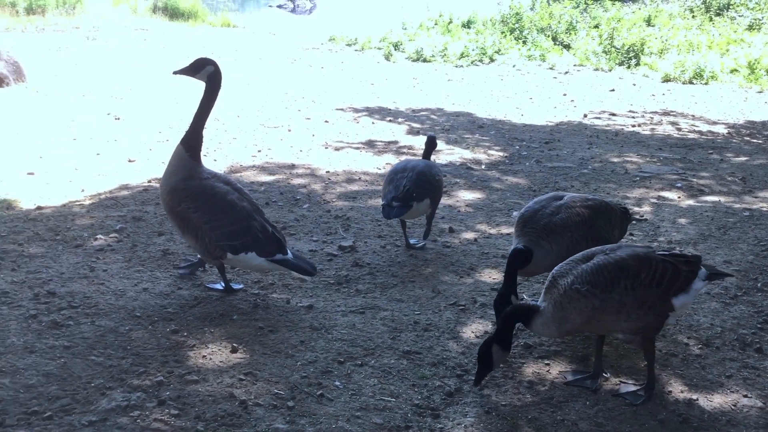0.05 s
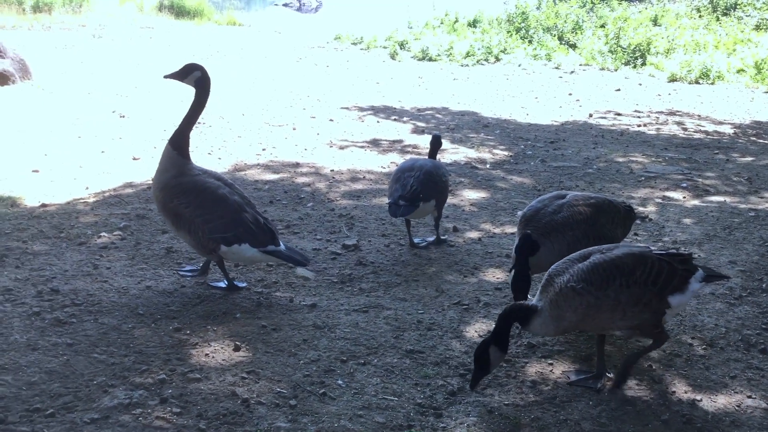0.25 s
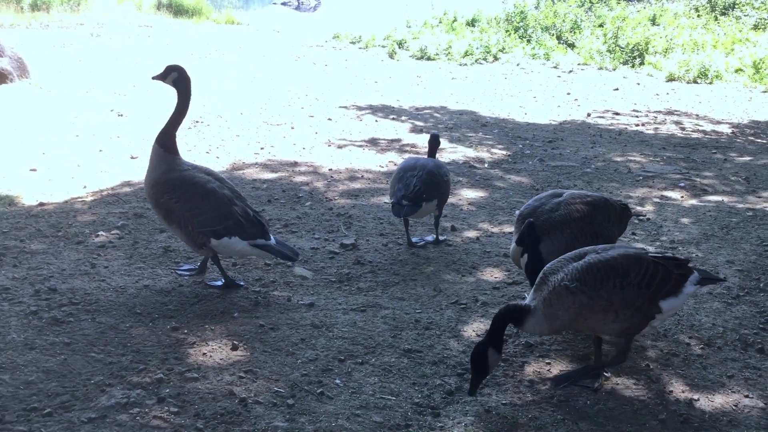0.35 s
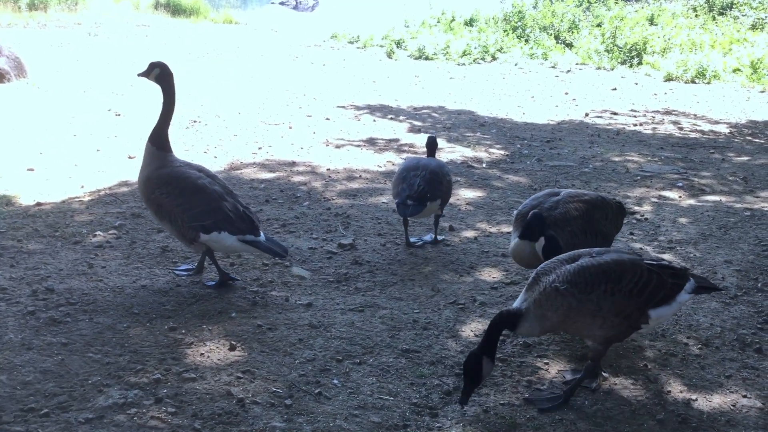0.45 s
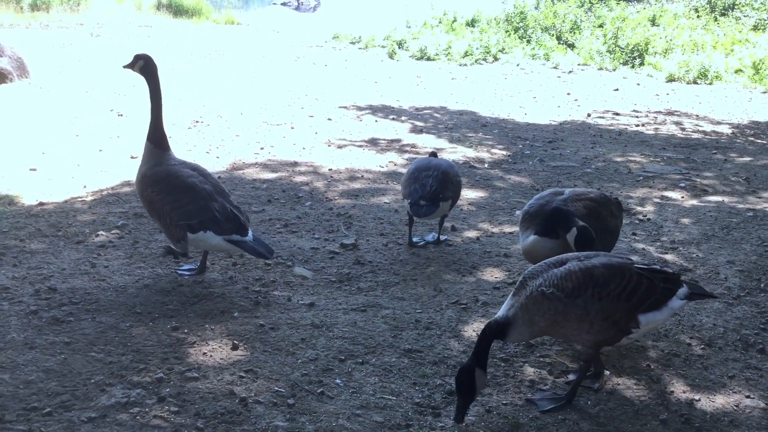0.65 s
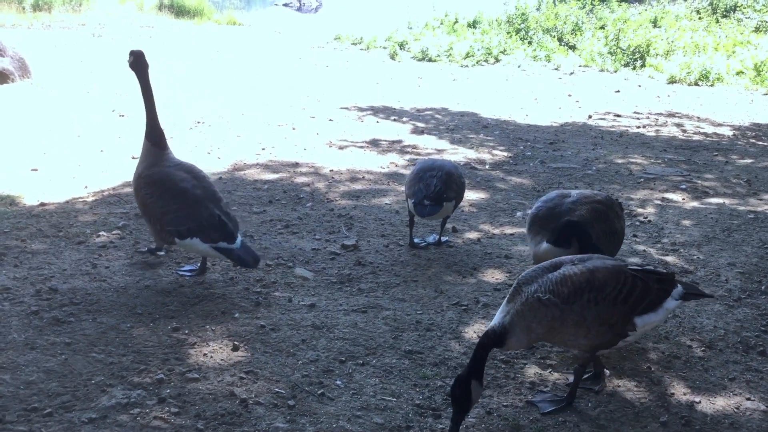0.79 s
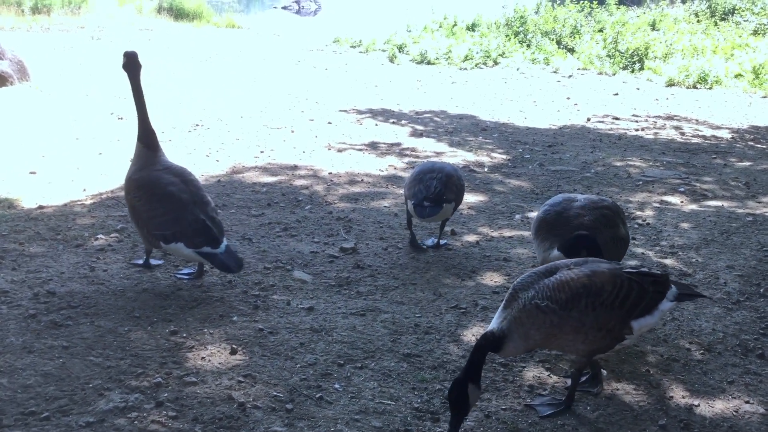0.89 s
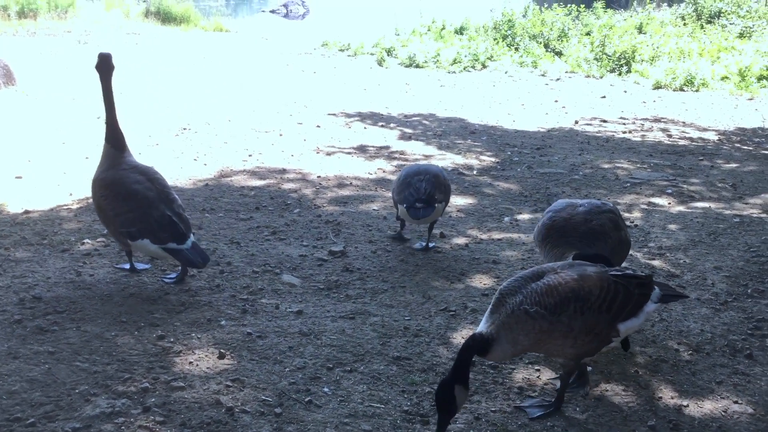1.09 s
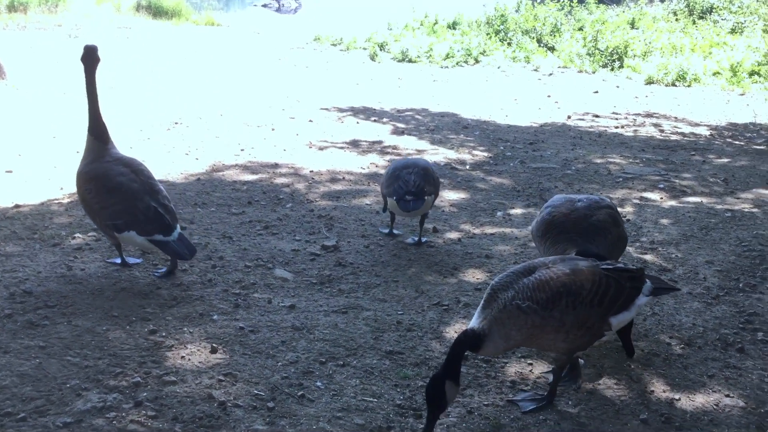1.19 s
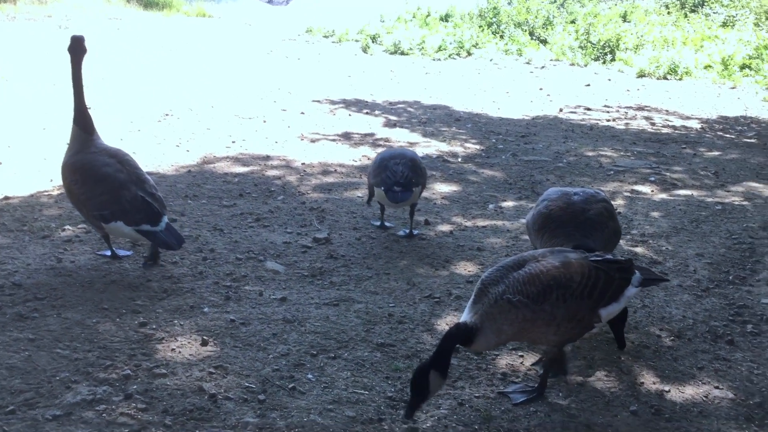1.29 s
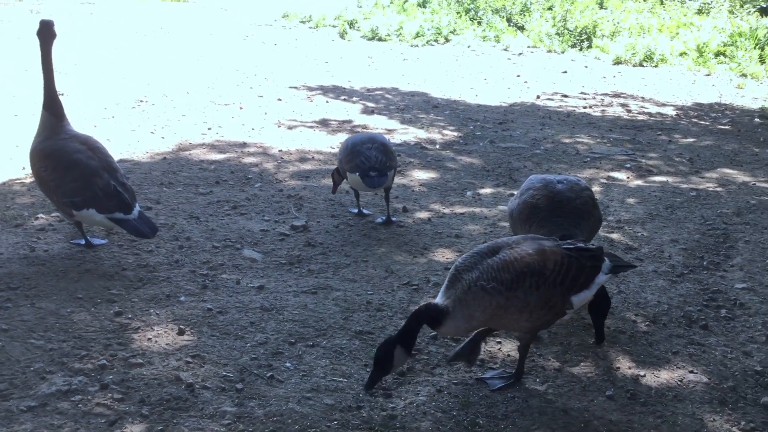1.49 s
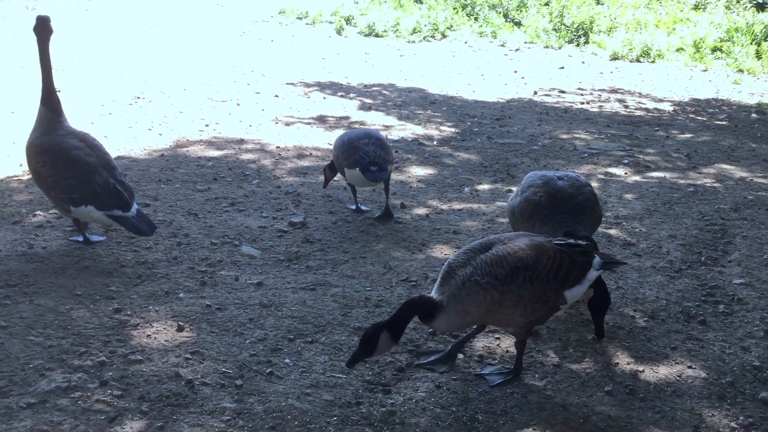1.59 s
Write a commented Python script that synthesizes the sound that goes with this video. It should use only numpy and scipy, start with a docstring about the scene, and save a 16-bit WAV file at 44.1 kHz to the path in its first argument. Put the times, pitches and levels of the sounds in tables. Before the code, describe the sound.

A goose gives three quick, thin honks while the flock steps and pecks in grit.

```python
"""A goose gives three quick, thin, almost whistled calls on a shady shore. Each arches up and down in pitch and
flares where its pitch meets one of the throat's two resonances (pitches at which it rings easily). The last
call breaks into a squeak. The flock steps and pecks in dry grit, making soft thuds and short crunches, over a
low distant rumble and a soft wash of open air."""
import sys
import numpy as np
from scipy import signal
from scipy.fft import rfft, irfft, next_fast_len
from scipy.io import wavfile
from scipy.ndimage import map_coordinates

SR = 44100
rng = np.random.default_rng(int(sys.argv[2]) if len(sys.argv) > 2 else 0)


def dump(signal):
    """Clip the signal to [-1, 1] and save it as 16-bit WAV at the path in sys.argv[1]."""
    limited = np.clip(np.atleast_2d(signal).T, -1, 1)
    pcm = np.round(limited * 32767).astype(np.int16)
    wavfile.write(sys.argv[1], SR, pcm)


N = 72765

# Tone colour of the rumble, the air, shuffled grit and cracking grains (frequency [Hz], level [dB])
RUMBLE_COLOUR = [(25, -51.5), (40, -40.5), (55, -18), (80, -9), (120, -5), (165, -0.5), (215, -1),
                 (270, -8), (350, -13.5), (480, -24), (700, -54)]
AIR_COLOUR = [(200, -30.5), (420, -3.5), (650, -0.5), (950, 2.5), (1400, 0), (2100, -8.5), (3000, -14.5),
              (4200, -16.5), (7000, -22.5), (9000, -21), (11000, -27), (14500, -32.5)]
SHUFFLE_COLOUR = [(1000, -14), (3000, 9), (5500, 0), (9000, -9), (15000, -10.5)]
SNAP_COLOUR = [(1500, -27), (3500, -0.5), (6500, 1.5), (9000, -4.5), (14000, -7)]
# Steps and pecks in the grit (time [s], level [dB], time to fade by 60 dB [s], centre frequency [Hz])
CRUNCHES = [(.075, -72.5, 0.086, 6900), (.1, -69.5, 0.055, 4840), (.163, -63.5, 0.1, 4630),
            (.199, -66, .06, 5200), (.26, -63.5, .04, 4700), (0.285, -64, 0.013, 4200),
            (0.31, -67.5, .018, 6200), (.365, -67.5, 0.082, 4550), (.378, -67, 0.12, 4530),
            (0.475, -70, 0.032, 4950), (.736, -76.5, 0.02, 4940), (0.879, -70.5, .03, 4740),
            (1.006, -65.5, 0.043, 5560), (1.05, -75, 0.29, 5400), (1.147, -75, 0.013, 3870),
            (1.214, -68.5, 0.029, 3730), (1.277, -69.5, 0.041, 3160), (1.484, -73.5, .08, 4300),
            (1.545, -74, 0.049, 8200)]
# Soft thuds of feet (time [s], level [dB], pitch [Hz])
FOOTFALLS = [(0.159, -47.5, 147), (0.229, -45, 159.4), (0.536, -54.5, 105), (.585, -56.5, 94.8),
             (0.732, -54, 181), (.823, -51.5, 154), (0.946, -51, 111), (1.153, -49.5, 158)]
# Single grains cracking (time [s], level [dB])
SNAPS = [(0.162, -61.5), (.479, -60.5), (.881, -74), (1.008, -69), (1.148, -75), (1.215, -79), (1.278, -69)]
# The path of each call (time [s], pitch [Hz], effort [dB])
CALL_1 = [(0.2315, 897.4, -59.5), (0.2479, 985.5, -28.5), (0.2606, 1131, -32), (0.283, 1032, -25),
          (0.292, 1023, -27), (0.3095, 997, -30.5), (0.3151, 926, -29), (0.3211, 866, -35),
          (0.3327, 843, -37.5), (0.337, 845, -57)]
CALL_2 = [(0.3933, 1094, -54.2), (0.4104, 1176, -38.5), (0.4146, 1363, -39), (0.4336, 1519, -43),
          (0.4433, 1380, -33), (0.4519, 1245, -36.5), (0.4711, 1153, -30), (0.4807, 1016, -44.5),
          (0.4874, 850, -52)]
CALL_3 = [(0.5262, 928, -51.5), (0.5382, 973, -28.5), (0.5572, 1247, -25), (0.568, 1682, -39.5),
          (0.5877, 1878, -28), (0.6018, 1700, -39.5), (0.6107, 1368, -23), (0.6167, 1259, -19.6),
          (0.6304, 1150, -18), (0.6403, 962, -36), (0.648, 983, -68.5)]
# The voice of each call (path, base level at twice the pitch [dB], base level at three times the
# pitch [dB], extra rasp [dB], throaty start [dB], overtone drift [dB/s])
VOICES = [(CALL_1, -71, -75, -4.5, -48.5, -130), (CALL_2, -65, -73.5, -6, -67, 40),
          (CALL_3, -71, -84.5, -3.5, -65, -29)]
# How the throat shapes the main tone (pitch [Hz], gain [dB])
THROAT_GAIN = [(800, -15), (900, -3), (1000, 0.0), (1110, -10.5), (1220, -5), (1330, -6.5), (1480, -19),
               (1700, -24), (1950, -31.5)]
# How the beak shapes the overtones, the higher tones above it (frequency [Hz], gain [dB])
BEAK_GAIN = [(1700, -9), (2050, 4.5), (2300, -0.5), (2500, -5), (2850, 3.5), (3050, -4.5), (3350, 10),
             (3600, 0.5), (3900, -7), (6000, -15.5)]
# Tone colour of the rasp in the voice (frequency [Hz], level [dB])
RASP_COLOUR = [(300, -18.5), (700, -5.5), (1200, 2.5), (1700, -8.5), (2300, 2.5), (3000, -11.5), (3700, -6),
               (5500, -18.5), (9000, -30.5), (15000, -43)]
# Echoes from the ground and the bank (delay [s], level [dB])
ECHOES = [(.011, -29), (0.025, -26.5)]
# Resonances of one firmer peck (frequency [Hz], width [Hz], level [dB])
PECK_RESONANCES = [(1610, 170, -10), (2580, 193, 5), (3440, 350, -4), (5050, 420, -8), (9000, 670, -21.5)]


def amp(db):
    """Turn decibels into a number to multiply by."""
    return 10 ** (np.asarray(db) / 20)


def unit(x):
    """Scale a sound to an average strength (rms) of 1."""
    return x / np.sqrt(np.mean(x ** 2) + 1e-20)


def clock():
    """The time of every sample, in seconds."""
    return np.arange(N) / SR


def along(points, hz):
    """Read between a table's (frequency, value) points, with octaves evenly spaced."""
    f, v = np.transpose(points)
    return np.interp(np.log(hz + 1), np.log(f + 1), v)


def wobble(per_s):
    """A smooth curve through per_s random values a second."""
    return map_coordinates(rng.standard_normal(2048), [clock() * per_s], mode="wrap")


def filtered(x, response):
    """Turn each frequency f in x up or down by response(f)."""
    size = next_fast_len(N + 8192)
    return irfft(rfft(x, size) * response(np.fft.rfftfreq(size, 1 / SR)), size)[:N]


def noise(colour):
    """Noise of strength 1 with the given tone colour."""
    return unit(filtered(rng.standard_normal(N), lambda f: amp(along(colour, f))))


def resonance(f, hz, width):
    """A response that favours frequencies near hz."""
    return 1j * f * width / (hz * hz - f * f + 1j * f * width)


def burst(at_s, rise_s, fade_s):
    """A loudness curve that swells until at_s, then falls 60 dB in fade_s."""
    t = clock() - at_s
    return np.exp(np.minimum(t, 0) / rise_s) * amp(-60 * np.maximum(t, 0) / fade_s)


def grains():
    """Noise whose level flickers fast, so it sounds gritty."""
    return rng.standard_normal(N) * amp(3 * wobble(900))


def shore():
    """Distant rumble and open air, each swaying a little in level."""
    rumble = amp(-63.5 + 1.5 * wobble(11.9)) * noise(RUMBLE_COLOUR)
    air = amp(-67 + 0.7 * wobble(5.5)) * noise(AIR_COLOUR)
    return rumble + air


def grit(sharpness=2.2, hiss_db=-28.5):
    """Feet and bills crunch in dry soil, with a soft shuffle in between."""
    shuffle = unit(filtered(grains(), lambda f: amp(along(SHUFFLE_COLOUR, f))))
    out = amp(-81.5 + 3.5 * wobble(57)) * shuffle
    for at_s, db, fade_s, hz in CRUNCHES:
        scrape = unit(filtered(grains(), lambda f: resonance(f, hz, hz / sharpness) ** 2 + amp(hiss_db)))
        out += amp(db) * burst(at_s, rise_s=0.0023, fade_s=fade_s) * scrape
    return out


def footfalls(rise_s=0.0035, fade_s=0.057):
    """Webbed feet pat the ground, each making a short, low tone."""
    out = np.zeros(N)
    for at_s, db, hz in FOOTFALLS:
        age = np.maximum(clock() - at_s, 0)
        soft_start = 1 - np.exp(-age / rise_s)
        out += amp(db) * burst(at_s, rise_s, fade_s) * soft_start * np.sin(2 * np.pi * hz * age)
    return out


def snaps():
    """Grains of grit crack crisply under feet and bills."""
    loudness = sum(amp(db) * burst(at_s, rise_s=0.0005, fade_s=0.0066) for at_s, db in SNAPS)
    return loudness * noise(SNAP_COLOUR)


def goose_call(path, second_db, third_db, rasp_db, start_db, drift_db_per_s):
    """A nearly pure tone glides through the throat, with weak overtones, rasp and a throaty start."""
    usual_effort_db, break_hz, edge_s = -24, 1560, 0.004
    t = clock()
    times, hz, db = np.transpose(path)
    pitch = np.interp(t, times, hz) * (1 + 0.003 * wobble(300))
    effort_db = np.interp(t, times, db) + 0.7 * wobble(300)
    push_db = effort_db - usual_effort_db
    airy = 1 / (1 + (break_hz / pitch) ** 20)  # nears 1 above break_hz, where the voice turns airy
    phase = 2 * np.pi * np.cumsum(pitch) / SR + 0.4 * airy * wobble(900)
    hoarseness = 0.12 * wobble(900)
    tone = amp(effort_db + along(THROAT_GAIN, pitch)) * np.sin(phase)
    drift_db = drift_db_per_s * (np.clip(t, times[0], times[-1]) - times.mean())
    # Pushing harder lifts both the overtones and the rasp.
    bright_db = 0.34 * push_db + drift_db
    for multiple, base_db in ((2, second_db), (3, third_db)):
        gain = amp(base_db + bright_db + along(BEAK_GAIN, multiple * pitch) + 2 * wobble(70))
        tone += gain * np.sin(multiple * (phase + hoarseness))
    rasp = amp(-65.5 + rasp_db + 0.25 * push_db + 9.5 * airy) * noise(RASP_COLOUR)
    throaty = unit(filtered(rng.standard_normal(N), lambda f: resonance(f, hz=820, width=250) ** 2))
    start = amp(start_db) * burst(times[0] + 0.0061, rise_s=0.0013, fade_s=0.16) * throaty
    on_off = np.clip(np.minimum(t - times[0], times[-1] - t) / edge_s + 0.5, 0, 1)
    return on_off * (np.sqrt(2) * tone + rasp + start)


def outdoors(x, tail_db=-31, fade_s=0.18):
    """Add two weak echoes from the ground and bank, and a short, thin tail from the trees."""
    scatter = rng.standard_normal(N) * amp(-60 * clock() / fade_s)
    echoes = filtered(x, lambda f: sum(amp(db) * np.exp(-2j * np.pi * f * s) for s, db in ECHOES))
    tail = signal.fftconvolve(x, scatter / np.linalg.norm(scatter))[:N]
    return x + echoes + amp(tail_db) * tail


def squeak(hz=3610, level_db=-60):
    """A brief high ring as the last call breaks upward."""
    phase = 2 * np.pi * hz * clock() + 0.4 * wobble(900)
    return amp(level_db) * burst(at_s=0.574, rise_s=0.004, fade_s=0.06) * np.sqrt(2) * np.sin(phase)


def peck(level_db=-52):
    """One firmer peck: a short, hollow scrape of a bill."""
    def hollow(f):
        return sum((-1) ** k * amp(db) * resonance(f, hz, width)
                   for k, (hz, width, db) in enumerate(PECK_RESONANCES))
    scrape = unit(filtered(grains(), hollow))
    return amp(level_db) * burst(at_s=0.927, rise_s=0.0025, fade_s=0.039) * scrape


def scene():
    """The calling goose and its flock on the shore, in one channel."""
    goose = sum(outdoors(goose_call(*voice)) for voice in VOICES)
    return (goose + squeak() + grit() + snaps() + peck() + footfalls() + shore())[None]


def record(dry):
    """Cut away the very highest treble."""
    top_hz = 14600
    return filtered(dry[0], lambda f: f < top_hz)[None]


dry = scene()
out = record(dry)
dump(out)
```